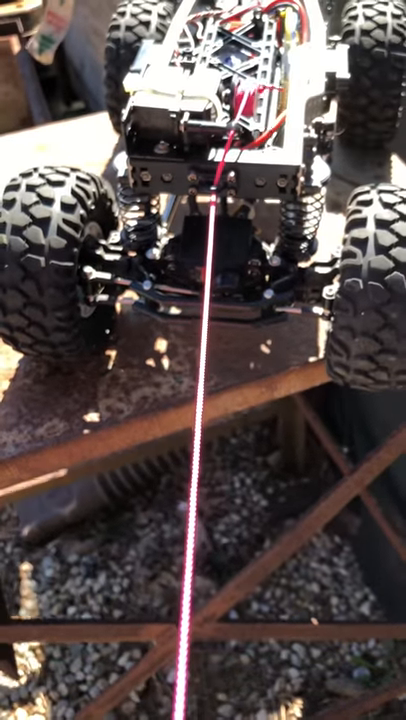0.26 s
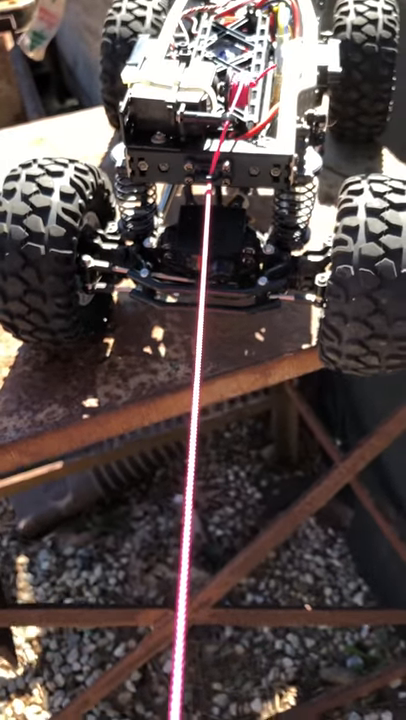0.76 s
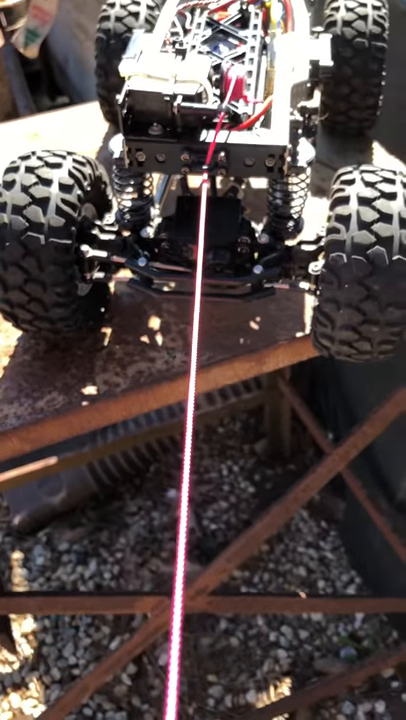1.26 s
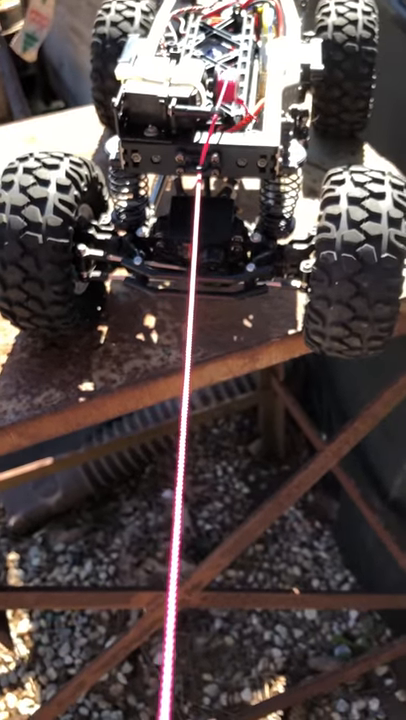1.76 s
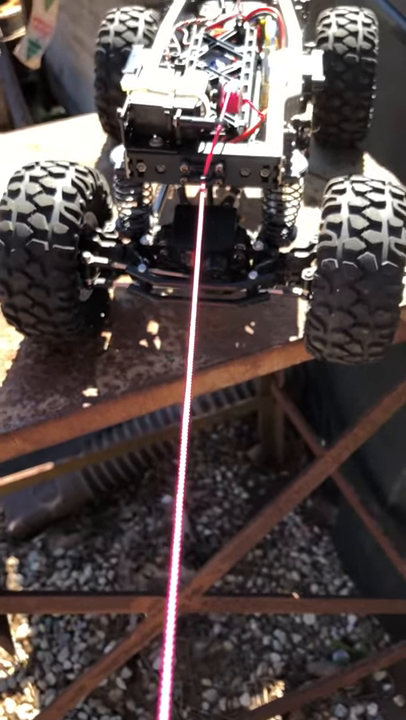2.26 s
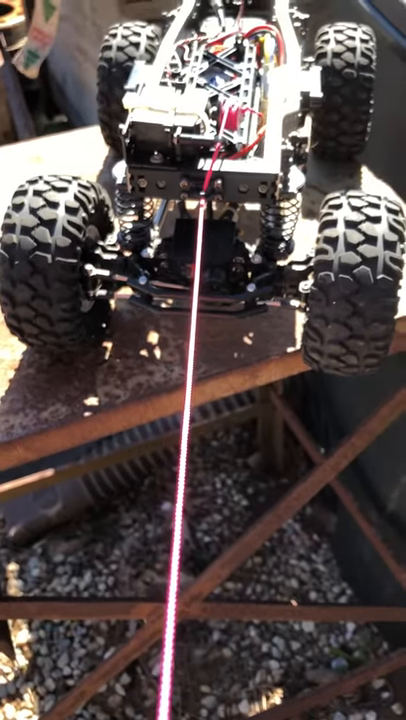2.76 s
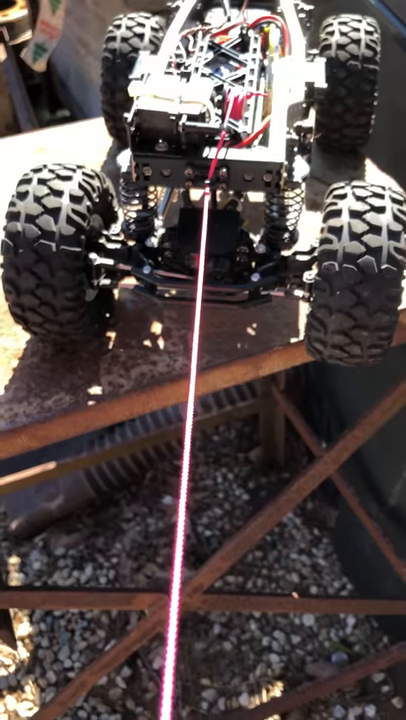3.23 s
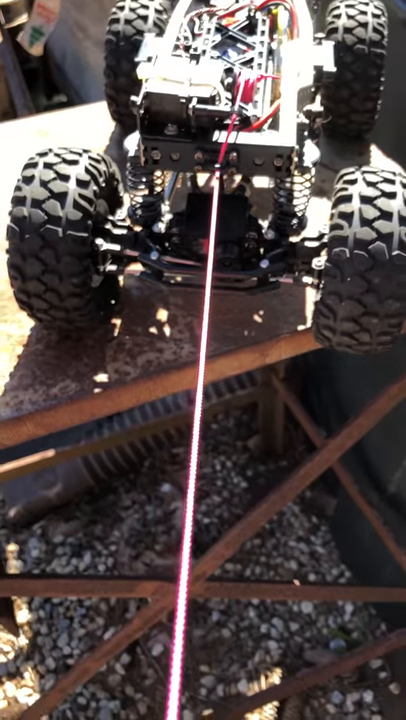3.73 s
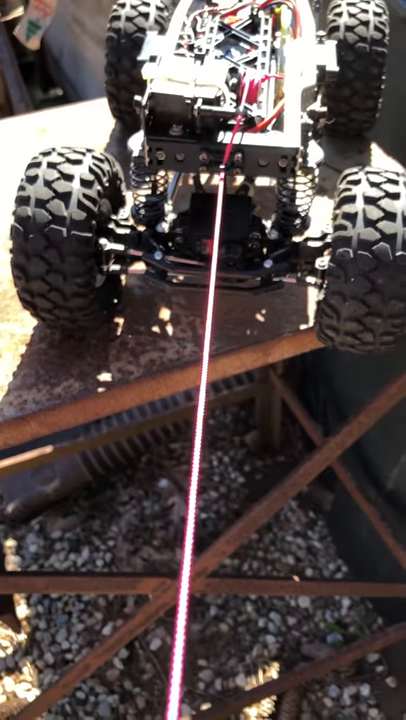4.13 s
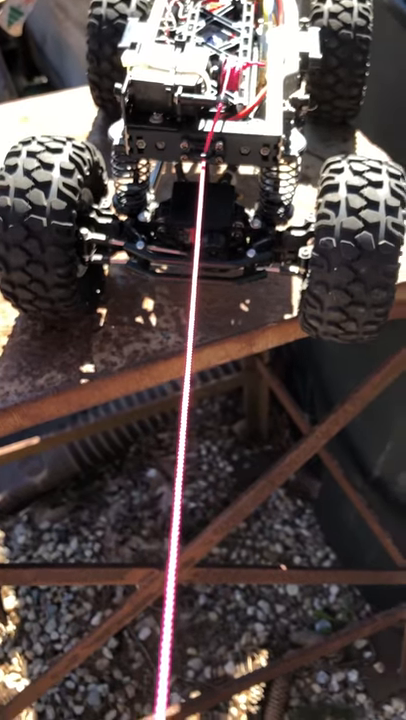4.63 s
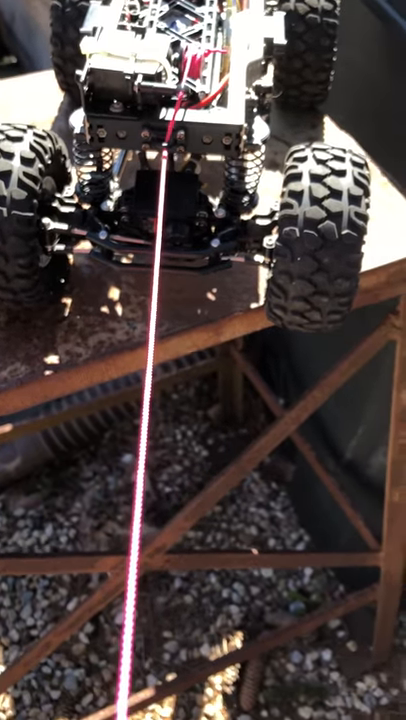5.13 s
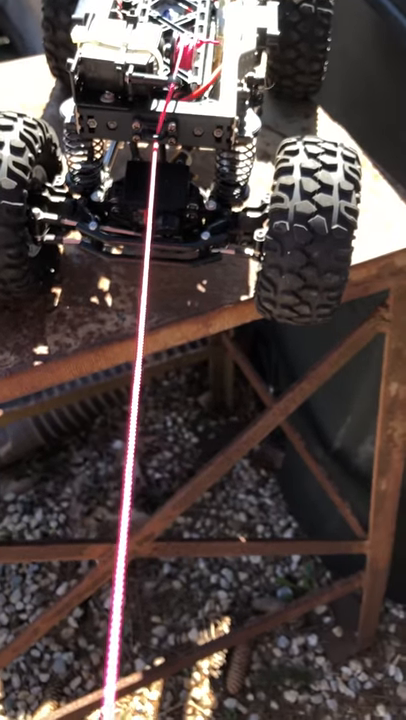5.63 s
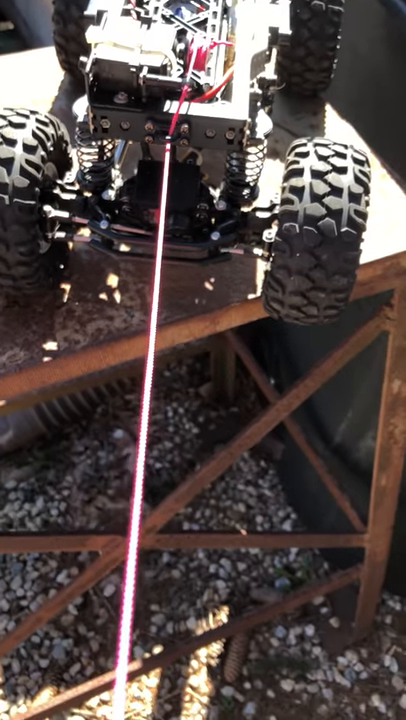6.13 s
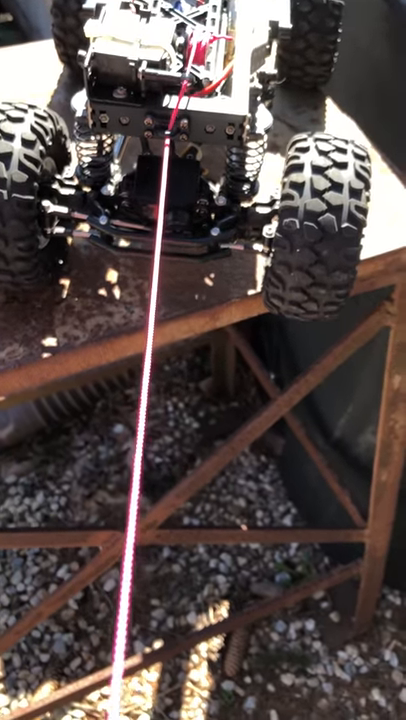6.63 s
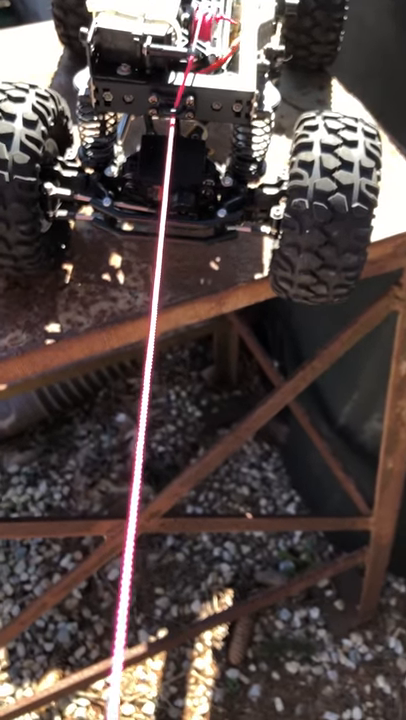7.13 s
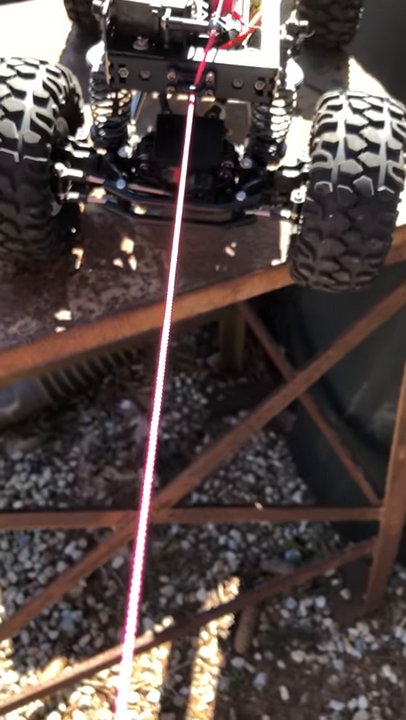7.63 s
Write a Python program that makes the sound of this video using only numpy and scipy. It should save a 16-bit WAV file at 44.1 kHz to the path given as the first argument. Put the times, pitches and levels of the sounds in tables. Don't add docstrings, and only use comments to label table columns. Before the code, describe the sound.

Outdoor close pickup of a small electric winch: bright, dry, gritty gear noise with hard clicks against steel. It stutters into a cluster of low, rattling bumps, then the motor weakens and stops. A quiet stretch follows with tiny line ticks, a brief scrape, a soft tap and far birds over a wavering machine hum and breeze. At the end the winch jumps back to life, hissing with a high toothy whine.

```python
import sys
import numpy as np
from scipy import signal
from scipy.fft import rfft, irfft, next_fast_len
from scipy.io import wavfile
from scipy.ndimage import uniform_filter1d

SR = 44100
rng = np.random.default_rng(int(sys.argv[2]) if len(sys.argv) > 2 else 0)


def amplitude_ratio(level_db):
    exponent = np.asarray(level_db, float) / 20
    return 10 ** exponent


def store_wav(level_fs):
    pcm = np.round(np.clip(np.atleast_2d(level_fs), -1, 1) * 32767)
    wavfile.write(sys.argv[1], SR, pcm.T.astype(np.int16))


N = 347508
T = np.arange(N) / SR


def evened(x):
    return x / np.sqrt(np.mean(x ** 2) + 1e-20)


def curve(rows):
    s, *columns = np.transpose(rows)
    inside = np.minimum(T - s[0], s[-1] - T) * 500
    gate = np.clip(inside + (T < .01) + (T > T[-1] - .01), 0, 1)
    return [np.interp(T, s, c) for c in columns] + [gate]


def steady(start, stop, db, turns):
    return curve([(start, db, turns), (stop, db, turns)])


def shape(points, hz):
    f, db = np.transpose(points)
    return amplitude_ratio(np.interp(np.log(hz + 1), np.log(f + 1), db))


def peaks(rows, hz):
    return np.sqrt(sum(amplitude_ratio(2 * db) / (1 + (2 * (hz - f) / w) ** 2) ** 2 for f, w, db in rows))


def coloured(x, gain):
    n = next_fast_len(len(x), True)
    spectrum = rfft(x, n) * gain(np.fft.rfftfreq(n, 1 / SR))
    return evened(irfft(spectrum, n)[:len(x)])


def drift(rate_hz):
    slow = coloured(rng.standard_normal(N // 32 + 2), lambda hz: 1 / (1 + (hz / 32 / rate_hz) ** 4))
    return np.interp(np.arange(N) / 32, np.arange(len(slow)), slow)


def swells(rows):
    return sum(amplitude_ratio(db) * np.exp(-((T - s) / half) ** 2) for s, db, half in rows)


def add(mix, s, sound):
    part = mix[round(s * SR):][:len(sound)]
    part += sound[:len(part)]


THROBS = [(1, 0.07), (.372, 0.11), (.186, 0.13), (.74, 0.05)]
# (pitch [Hz], width [Hz], depth [0-1])
NOTCHES = [(8100, 280, 0.1), (10160, 220, 0.16), (11320, 300, .65)]


def gears(run, case, bed, change=((1, 0), (2, 0)), bed_db=-8., grit_db=2.5):
    db, shaft, gate = run
    teeth = rng.standard_normal(N) * amplitude_ratio(grit_db * np.minimum(rng.exponential(1, N), 6))
    turns = np.cumsum(shaft * (1 + 0.08 * drift(2))) / SR
    throb = 1 + sum(d * np.cos(2 * np.pi * (k * turns + rng.random())) for k, d in THROBS)

    def colour(hz):
        dips = np.prod([1 - min(d, .9) / (1 + (2 * (hz - f) / w) ** 2) for f, w, d in NOTCHES], axis=0)
        return np.hypot(peaks(case, hz), amplitude_ratio(bed_db) * shape(bed, hz)) * shape(change, hz) * dips

    body = coloured(teeth * throb, colour)
    return body * amplitude_ratio(db + 0.9 * drift(19)) * gate, body


# (pitch [Hz], width [Hz], level [dB])
CASE_IN = [(1944, 59, -7), (2530, 23, -25), (3474, 90, -1), (5040, 950, -8), (7166, 580, -1.5),
           (8985, 510, 3.5), (9620, 700, -4.5), (10720, 720, -2.5), (10760, 430, -3), (12340, 600, -2.5),
           (13200, 570, -3.5)]
# (pitch [Hz], level [dB])
BED_IN = [(240, -41), (400, -16), (1800, -9.5), (3500, -6.5), (6200, -8.5), (9000, -1), (13000, 0.5),
          (14500, -4.5), (15700, -5)]
# (time [s], level [dB])
SLIPS = [(1.577, -46), (1.6, -50), (1.627, -47), (1.647, -47), (1.695, -44.5), (1.728, -53), (1.754, -43.5),
         (1.788, -46), (1.818, -45), (1.836, -45), (1.884, -43), (1.948, -44), (1.973, -48), (2.007, -42),
         (2.033, -45)]
# (time [s], level [dB])
DRAG = [
    (1.55, -51),
    (2.07, -58),
]


def reel_in():
    run = steady(start=0, stop=1.552, db=-40, turns=110)
    pull, body = gears(run, CASE_IN, BED_IN, bed_db=-4.5, grit_db=1.5)
    grip, t = np.zeros(N), T[:4096]
    catch = np.clip(np.minimum(t / 0.0018, (.018 - t) / .006 + 1), 0, 1)
    for s, db in SLIPS:
        add(grip, s, amplitude_ratio(db) * catch)
    drag_db, gate = curve(DRAG)
    return pull + body * (grip + amplitude_ratio(drag_db) * gate)


# (pitch [Hz], level [dB per Hz])
WASH = [(15, -52), (25, -53), (65, -6.5), (114, -10), (149, -5), (176, -8), (294, -12.5), (479, -13.5),
        (780, -20), (1500, -31.5), (2800, -38.5), (7000, -43), (14000, -45), (15800, -48)]
# (pitch [Hz], level [dB])
GUST = [(20, -36), (45, 2.5), (65, 1.5), (110, 0), (200, -15.5), (400, -36), (1000, -120)]
# (time [s], level [dB], half length [s])
PUFFS = [
    (0, -52, .08),
    (1.3, -53, .06),
    (1.385, -42, .025),
    (1.49, -45, .03),
    (1.58, -52, .04),
    (4.2, -58, .2),
    (5.15, -57, .13),
    (5.57, -54, .04),
    (5.78, -55, .06),
]
# (time [s], level [dB])
HUM = [(0, -53), (1.1, -57), (1.8, -52), (2.6, -66), (2.9, -60), (4.16, -65.5), (4.47, -50), (5.1, -53),
       (5.5, -60), (5.78, -57), (5.95, -63), (6.97, -53.5), (7.66, -59.5), (7.88, -55)]
# (time [s], level [dB], half length [s])
OVERTONE = [
    (4.55, -66, .2),
    (6.3, -65, .5),
]
# (pitch [Hz], level [dB])
TONES = [
    (8818, -98),
    (11757, -90),
    (14702, -91),
]


def yard():
    out = amplitude_ratio(-58.5) * coloured(rng.standard_normal(N), lambda hz: shape(WASH, hz))
    breeze_db = -62.5
    wind = (amplitude_ratio(breeze_db) + swells(PUFFS)) * amplitude_ratio(2 * drift(9.6))
    out += wind * coloured(rng.standard_normal(N), lambda hz: shape(GUST, hz))
    hum_hz = 147.5 - .9 * np.maximum(T - 5.2, 0) + .4 * drift(3)
    turns = np.cumsum(hum_hz) / SR
    out += np.sqrt(2) * amplitude_ratio(curve(HUM)[0] + 0.8 * drift(2.7)) * np.sin(2 * np.pi * turns)
    out += np.sqrt(2) * swells(OVERTONE) * amplitude_ratio(2.2 * drift(7)) * np.sin(4 * np.pi * turns)
    for hz, db in TONES:
        out += np.sqrt(2) * amplitude_ratio(db + drift(2.4)) * np.sin(2 * np.pi * hz * T)
    return out


def crack(colour, t60, tail_db, tilt_db=0.):
    t = np.arange(2048) / SR
    tilted = lambda hz: shape(colour, hz) * amplitude_ratio(tilt_db * np.log2(hz / 7000 + .1))
    snap = coloured(rng.standard_normal(2048), tilted)
    return snap * (amplitude_ratio(-60 * t / t60) + amplitude_ratio(tail_db - 700 * t)) * np.minimum(t * 5000, 1)


# (pitch [Hz], level [dB], time to fall 60 dB [s])
FRAME = [(840, 1.5, 0.05), (938, -5, 0.038), (1308, 1.5, 0.04), (1700, -15, 0.03), (1997, 1.5, 0.03),
         (2480, 4, 0.024), (3450, -8, 0.02)]
# (pitch [Hz], level [dB])
CRACK = [(600, -60), (1500, -9), (2300, 3), (3300, -1.5), (4900, 6), (6200, -2.5), (7300, 1.5), (12000, -8),
         (16000, -11)]
# (time [s], low ring [dB], bright crack [dB], crack tilt [dB per octave], falling ping [dB])
KNOCKS = [(0.094, -34.5, -44, -3, -33), (0.271, -49, -56, 0.1, -55), (0.297, -33, -44, -3, -28),
          (0.533, -32, -40, -3, -32), (0.684, -34, -38, 5, -37), (1.037, -44, -42, 2, -50),
          (1.184, -32.5, -44, 2, -31), (1.632, -42, -45, 7, -42), (1.78, -31, -37, 3, -32),
          (2.598, -30, -33, -0.5, -32), (2.897, -30.5, -35.5, 3, -32), (3.208, -52, -49.5, 0.1, -58),
          (3.216, -42, -46, -1.5, -45), (4.126, -30, -35, 1.5, -32), (4.311, -36, -30, -2.5, -36),
          (6.879, -34, -50, -3, -45), (7.1, -35, -28, -4.5, -37)]


def knocks():
    out, t = np.zeros(N), np.arange(4096) / SR
    sweep_hz = 900 + (2850 - 900) * np.exp(-t / .0028)
    ping = amplitude_ratio(-60 * t / .017) * np.sin(2 * np.pi * np.cumsum(sweep_hz) / SR)
    weak_modes = lambda hz: peaks([(1170, 1800, -0.5), (2390, 750, 0)], hz) * (hz > 700)
    for s, ring_db, crack_db, tilt_db, ping_db in KNOCKS:
        add(out, s, amplitude_ratio(ping_db) * ping)
        ring = np.zeros(len(t))
        for hz, db, t60 in FRAME:
            detune, phase = rng.random(2)
            tone = np.sin(2 * np.pi * (hz * (0.985 + .03 * detune) * t + phase))
            ring += amplitude_ratio(db - 60 * t / t60) * tone * np.minimum(t * hz / 2.33, 1) ** 2
        dense = coloured(rng.standard_normal(len(t)), weak_modes)
        ring = ring / abs(ring).max() + amplitude_ratio(-12 - 60 * t / 0.062) * np.minimum(t / 0.00033, 1) * dense
        add(out, s, amplitude_ratio(ring_db) * ring)
        add(out, s, amplitude_ratio(crack_db + 4.5) * crack(CRACK, 0.0094, -24.0, tilt_db))
    return out


# (time [s], level [dB])
STALL = [
    (1.54, -47.5),
    (2.028, -47),
    (2.2, -51),
    (2.616, -58.5),
    (3.085, -58),
    (3.14, -66),
    (3.21, -71),
    (3.25, -83),
]
# (pitch [Hz], change [dB])
STRAINED = [(500, 14), (2000, 6), (4900, 3.5), (6200, -7), (7250, 4), (9000, -12), (11500, -8), (15500, 8)]


def stall():
    effort_db, gate = curve(STALL)
    turns = 100
    return gears((effort_db, turns, gate), CASE_IN, BED_IN, STRAINED, bed_db=-5.5, grit_db=3.0)[0]


# (time [s], length [s], boom [dB])
LURCHES = [
    (1.82, .4, -29.5),
    (2.21, .17, -27),
]
# (pitch [Hz], level [dB])
BOOM = [(20, -40), (44, -18), (65, 4.5), (100, -7), (135, -4.5), (320, -13)]
# (pitch [Hz], width [Hz], level [dB])
RATTLE = [(395, 100, -1.5), (527, 62, -7), (767, 57, -6.5), (960, 130, -8), (1260, 72, -7.5),
          (1570, 110, -23)]
# (time [s], blow [dB], bright crack [dB])
BUMPS = [(1.836, -23, -45), (1.881, -23, -42), (1.897, -25, -46), (1.908, -16, -31.5), (1.941, -19, -40),
         (1.961, -30, -46), (1.985, -24, -47), (2.006, -27, -44), (2.03, -30, -42), (2.04, -30, -46),
         (2.046, -17, -33), (2.084, -29, -53), (2.117, -34, -55), (2.215, -34, -56), (2.225, -19.5, -36),
         (2.263, -15, -28), (2.282, -31, -48), (2.307, -18, -31), (2.329, -49, -44), (2.341, -23, -43),
         (2.366, -35, -48), (2.384, -30.5, -47), (2.473, -34, -66), (2.515, -41, -62)]


def bumps():
    shake = np.zeros(N)
    for s, length, db in LURCHES:
        sag_db = 28 * np.maximum(T - s, 0)
        fade_db = 165 * np.maximum(T - s - length, 0)
        shake += np.clip((T - s) / .035, 0, 1) * amplitude_ratio(db - sag_db - fade_db)
    noise = rng.standard_normal((3, N))
    ringing = lambda hz: np.hypot(peaks(RATTLE, hz), amplitude_ratio(-11.5) / (1 + (hz / 1500) ** 2)) * (hz > 150)
    out = shake * coloured(noise[0], lambda hz: shape(BOOM, hz) * (hz < 320))
    out += amplitude_ratio(-7) * shake * coloured(noise[1], ringing)
    blows, t = np.zeros(N), np.arange(4096) / SR
    for s, blow_db, crack_db in BUMPS:
        add(blows, s, amplitude_ratio(blow_db - 7 - 60 * t / 0.08) * np.minimum(t / 0.00098, 1))
        add(out, s, amplitude_ratio(crack_db - 1.5) * crack(CRACK, 0.026, -21.0, -4.5))
    return out + blows * coloured(noise[2], ringing)


# (pitch [Hz], level [dB])
TICK = [(900, -40), (2000, -3), (2600, -8), (3500, -1.5), (6000, -7), (8000, 3), (11500, -3), (16000, -5)]
# (time [s], level [dB])
TICKS = [(2.127, -41.5), (2.428, -38), (2.533, -44.5), (2.66, -42), (2.799, -45.5), (2.939, -44),
         (3.075, -43.5), (3.239, -49.5), (3.465, -49.5), (3.528, -56.5), (3.624, -60), (3.69, -50.5),
         (3.721, -54.5), (3.866, -50.5), (3.898, -62), (3.943, -54.5), (3.978, -54), (4.008, -55),
         (4.088, -49), (4.108, -63), (4.153, -54), (4.184, -55), (4.249, -50), (4.282, -50.5), (6.496, -68),
         (6.599, -71)]


def ticks():
    out = np.zeros(N)
    for s, db in TICKS:
        add(out, s, amplitude_ratio(db + 3) * crack(TICK, .013, -23., -1.5 + .4 * (db + 50)))
    return out


def note(length, start_hz, middle_hz, end_hz, warble_hz):
    u = np.linspace(-1, 1, round(length * SR))
    rough = signal.oaconvolve(rng.standard_normal((2, 4096)), np.hanning(128)[None], "same")
    rough = evened(rough)[:, :len(u)]
    bend = (end_hz - start_hz) / 2 * u + ((end_hz + start_hz) / 2 - middle_hz) * u ** 2
    glide = middle_hz + bend + warble_hz * rough[0]
    tone = np.sin(2 * np.pi * np.cumsum(glide) / SR) * signal.windows.tukey(len(u), .4)
    tone = tone * amplitude_ratio(2 * np.log2(np.clip(glide / 4800, .5, 1)))
    return np.sqrt(2) * amplitude_ratio(3.2 * rough[1]) * tone


# (time from its middle [s], length [s], start [Hz], middle [Hz], end [Hz])
OPENING = [
    (-.045, .022, 3850, 4500, 4750),
    (-.026, .017, 4800, 4150, 3700),
]
MIDDLE = [
    (-.012, .044, 4800, 5420, 4600),
    (.03, .03, 4600, 3750, 3200),
    (.011, .026, 3950, 4500, 4750),
    (.044, .012, 4400, 4200, 4000),
]
CLOSING = [
    (.085, .029, 2950, 3500, 4500),
    (.112, .018, 4500, 3700, 2930),
]
# (time [s], opening [dB], middle [dB], closing [dB], top pitch [Hz])
CALLED = [
    (2.548, -72, -62, -62, 5110),
    (3.136, -66, -62, -63, 5400),
    (4.03, -80, -62, -72, 5380),
    (4.947, -65, -62, -68, 5410),
    (5.723, -64, -58.5, -66, 5256),
    (6.993, -66, -63, -62, 5370),
]


def calls():
    out = np.zeros(N)
    for s, *levels, top_hz in CALLED:
        for strokes, db in zip([OPENING, MIDDLE, CLOSING], levels):
            for at, length, *hz in strokes:
                add(out, s + at, amplitude_ratio(db) * note(length, *np.multiply(hz, top_hz / 5400), 105))
    return out


# (time [s], length [s], start [Hz], end [Hz], level [dB])
WHISTLES = [(3.104, 0.014, 8500, 5950, -65), (3.146, .014, 7000, 9100, -78),
            (3.168, 0.0096, 9000, 6840, -73), (3.175, 0.017, 6840, 6160, -73),
            (3.178, .02, 4700, 5100, -62), (6.513, 0.017, 5140, 3800, -81), (6.633, .02, 4800, 3600, -79),
            (6.708, .012, 6940, 6700, -85), (6.747, 0.029, 5840, 3300, -78), (6.866, .014, 6200, 4600, -76),
            (6.95, 0.02, 7300, 6430, -75), (6.971, .02, 8200, 6800, -78), (7.076, 0.017, 7600, 6500, -73)]


def whistles():
    out = np.zeros(N)
    for s, length, start_hz, end_hz, db in WHISTLES:
        add(out, s, amplitude_ratio(db) * note(length, start_hz, (start_hz + end_hz) / 2, end_hz, 40))
    return out


# (time in the beat [s], length [s], start [Hz], middle [Hz], end [Hz])
DROPS = [
    (0, .016, 7700, 6600, 6280),
    (.03, .016, 7600, 6600, 6280),
]
RISES = [
    (0, .035, 4200, 5200, 6200),
    (.034, .035, 3600, 4700, 5500),
]
FLICKS = [
    (0, .014, 4900, 5350, 5000),
    (.002, .011, 5300, 4400, 3300),
    (.012, .012, 5300, 4500, 3300),
]
# (first beat [s], beat period [s], first level [dB], last level [dB])
TRILLS = [
    (3.844, .0993, -72, -57),
    (3.901, .0993, -71, -61),
    (5.056, .0618, -60.5, -60),
]


def trill(row, beat, beats, warble_hz, gain_db, grow_db=0, arch_db=0):
    out = np.zeros(N)
    first, period, first_db, last_db = row
    for k in range(beats):
        db = last_db + (first_db - last_db) * (1 - k / beats) ** 3 + gain_db
        db += arch_db * (np.sin(np.pi * (k + .5) / beats) - .5)
        for at, length, *hz in beat:
            sound = note(length, *hz, warble_hz)
            swell = np.linspace(-grow_db, 0, len(sound))
            add(out, first + k * period + at, amplitude_ratio(db + swell + rng.standard_normal()) * sound)
    return out


def birds():
    near = calls() + whistles()
    far = trill(TRILLS[0], DROPS, beats=20, warble_hz=70, gain_db=0.1, grow_db=9)
    far += trill(TRILLS[1], RISES, beats=11, warble_hz=260, gain_db=-1, grow_db=9)
    far += trill(TRILLS[2], FLICKS, beats=10, warble_hz=260, gain_db=-1, arch_db=5)
    t = np.arange(SR // 2) / SR
    echo = rng.standard_normal(len(t)) * amplitude_ratio(-60 * t / 0.43) * (t > .004)
    wet = signal.oaconvolve(amplitude_ratio(-4) * near + amplitude_ratio(-2.5) * far, echo / np.linalg.norm(echo))[:N]
    return near + amplitude_ratio(-4.5) * far + wet


# (pitch [Hz], width [Hz], level [dB])
SCUFF = [(2450, 300, 0), (3300, 900, -2), (6800, 1500, -12)]
# (time [s], level [dB])
SCUFFS = [
    (4.3905, -43),
    (4.401, -49),
    (4.407, -55),
]


def scuffs():
    out, t = np.zeros(N), np.arange(4096) / SR
    for s, db in SCUFFS:
        rasp = coloured(rng.standard_normal(len(t)), lambda hz: peaks(SCUFF, hz))
        add(out, s, amplitude_ratio(db - 60 * t / .03) * np.minimum(t / .0006, 1) * rasp)
    return out


# (time [s], level [dB], pitch [Hz], length [s])
TAPS = [
    (4.781, -33, 105, .024),
    (4.798, -35, 280, .008),
    (4.803, -38, 110, .022),
]


def taps():
    out = np.zeros(N)
    for s, db, hz, length in TAPS:
        t = np.arange(round(length * SR)) / SR
        add(out, s, amplitude_ratio(db) * np.hanning(len(t)) * np.cos(2 * np.pi * hz * (t - length / 2)))
    return out


# (pitch [Hz], width [Hz], level [dB])
CASE_OUT = [(3470, 230, -3), (4050, 77, -8), (4850, 480, -4), (5480, 450, -4.5), (7200, 540, -1.5),
            (8450, 200, -5), (9100, 450, 1.5), (10500, 500, -1), (10900, 400, -5), (12100, 720, -4),
            (13100, 780, -7)]
# (pitch [Hz], level [dB])
BED_OUT = [(410, -40), (700, -16), (1300, -17.5), (2000, -17), (2500, -14), (3500, -6.5), (6200, -6.5),
           (9000, -2.5), (13000, -8.5), (14500, 0.5), (15700, -7)]
# (pitch [Hz], change [dB])
SLACK = [(500, -9), (1500, 14), (2300, 11), (3200, 3), (6000, 5.5), (9000, 3.5), (12000, 7.5), (16000, 6)]
# (pitch [Hz], level [dB])
SLACK_WHINE = [(1450, -59), (2982, -50), (3420, -50.5), (5216, -54), (6745, -56), (6885, -48.5)]
LATE = slice(7 * SR, N)


def spin_up():
    start = 7.106
    db, turns, gate = steady(start, stop=7.24, db=-33, turns=135)
    db = db - 17 * np.exp(-np.maximum(T - start, 0) / .021)
    out = gears((db, turns, gate), CASE_OUT, BED_OUT, SLACK, bed_db=-1.0, grit_db=2.5)[0]
    for hz, line_db in SLACK_WHINE:
        gain = amplitude_ratio(line_db + 2 * db[LATE] + 70.5 + 3 * drift(60)[LATE]) * gate[LATE]
        out[LATE] += gain * np.sin(2 * np.pi * np.cumsum(hz + 45 * drift(133)[LATE]) / SR)
    return out


def patchy(x):
    z = signal.stft(x, nperseg=512)[2]
    patches = uniform_filter1d(rng.standard_normal(z.shape), 6, 0)
    patches = evened(uniform_filter1d(patches, 10, 1))
    return signal.istft(z * amplitude_ratio(1.4 * patches), nperseg=512)[1][:len(x)]


# (time [s], tooth rate [Hz], level [dB])
MESH = [
    (7.25, 1459, -56),
    (7.38, 1407, -57),
    (7.394, 1389, -62),
    (7.45, 1374, -61),
    (7.554, 1405, -59),
    (7.586, 1381, -62),
    (7.736, 1386, -61),
    (7.844, 1352, -62),
    (7.87, 1338, -67),
]
# (pitch [multiple of tooth rate], level [dB], blur [Hz], load following [factor])
MESH_ORDERS = [
    (1, -1, 8, 0.9),
    (2, -6.5, 20, -0.3),
    (2.5, -6.5, 45, -0.33),
    (2.95, -4, 25, .3),
    (3.45, -8, 45, -.3),
    (3.95, -8, 45, -.3),
    (5, 3, 60, 1.5),
    (5.9, -0.5, 45, -0.3),
]


def loaded_whine():
    run = steady(start=7.24, stop=7.88, db=-42.5, turns=140)
    run[0] = run[0] + 9 * np.maximum(T - 7.7, 0)
    out = np.zeros(N)
    out[LATE] = patchy(gears(run, CASE_OUT, BED_OUT, bed_db=-7.5, grit_db=3.0)[0][LATE])
    hz, db, _ = np.array(curve(MESH))[:, LATE]
    gate = run[2][LATE]
    for k, rel_db, blur_hz, follow in MESH_ORDERS:
        turns = np.cumsum(k * hz + blur_hz * drift(39.3)[LATE]) / SR
        flicker_db = 1.3 * np.sqrt(k) * drift(25)[LATE]
        level = amplitude_ratio((db + 60) * follow - 59 + rel_db + flicker_db)
        out[LATE] += np.sqrt(2) * level * gate * np.sin(2 * np.pi * turns)
    return out


def scene():
    winch = reel_in() + stall() + spin_up() + loaded_whine()
    frame = knocks() + bumps() + ticks() + scuffs() + taps()
    return (winch + frame + birds() + yard())[None]


def roll_off(x):
    return signal.sosfilt(signal.butter(12, 17040, fs=SR, output="sos"), x)


def record(dry):
    dry = .19 * np.tanh(dry / .19)
    edge = signal.firwin(1023, 15760, window=("kaiser", 6), fs=SR)
    inside = signal.oaconvolve(dry, edge[None], "same")
    return roll_off(inside + amplitude_ratio(-39) * (dry - inside))


dry = scene()
out = record(dry)
store_wav(out)
```